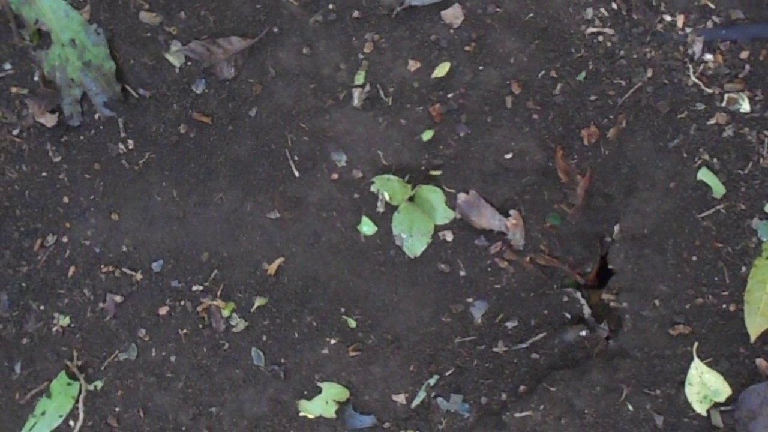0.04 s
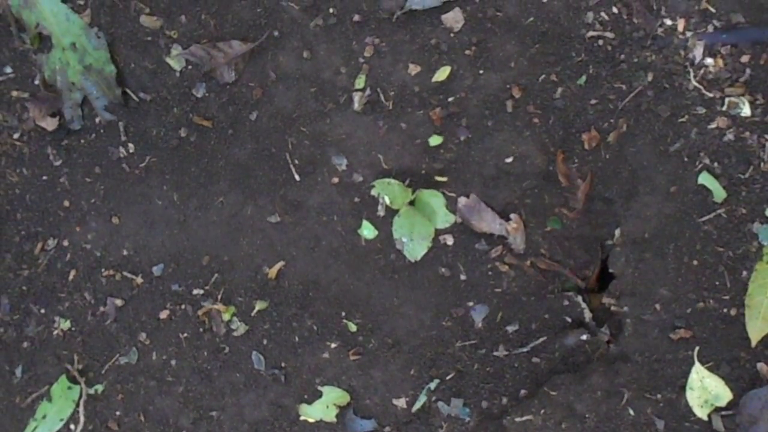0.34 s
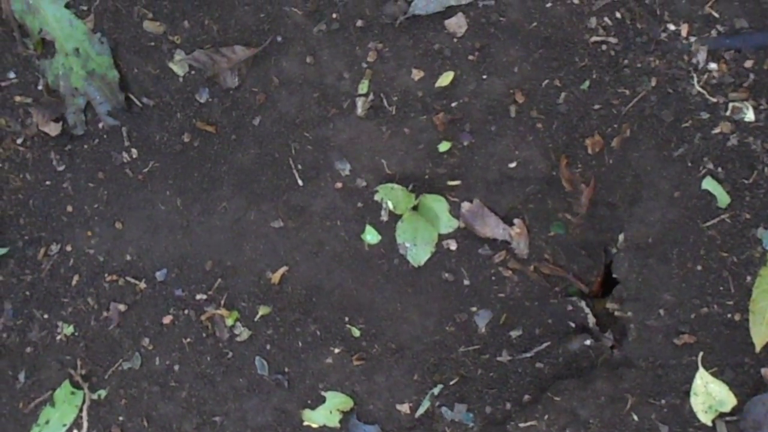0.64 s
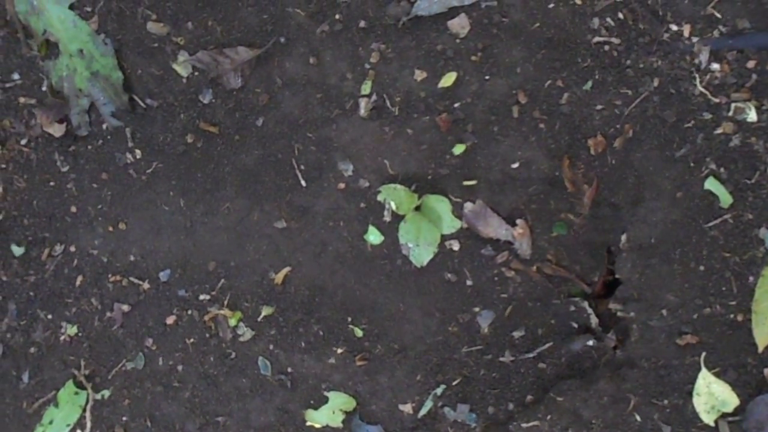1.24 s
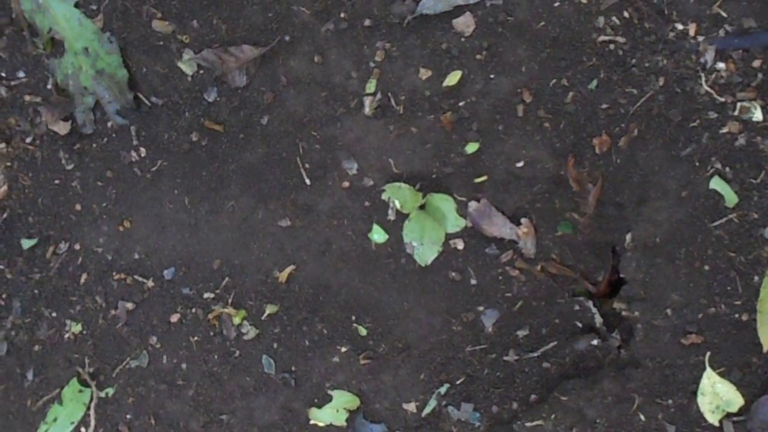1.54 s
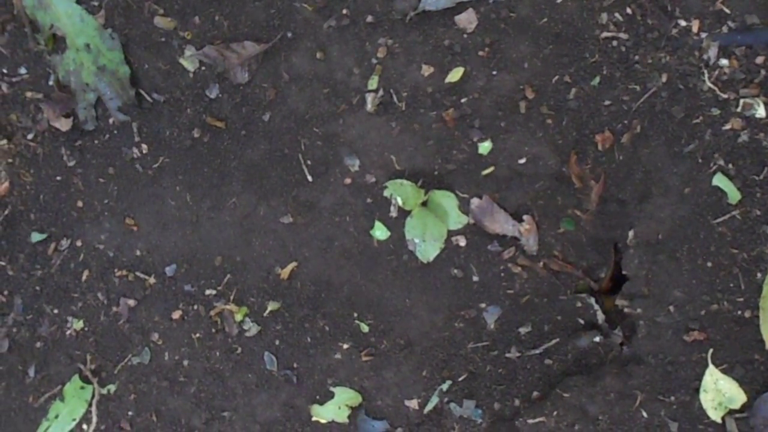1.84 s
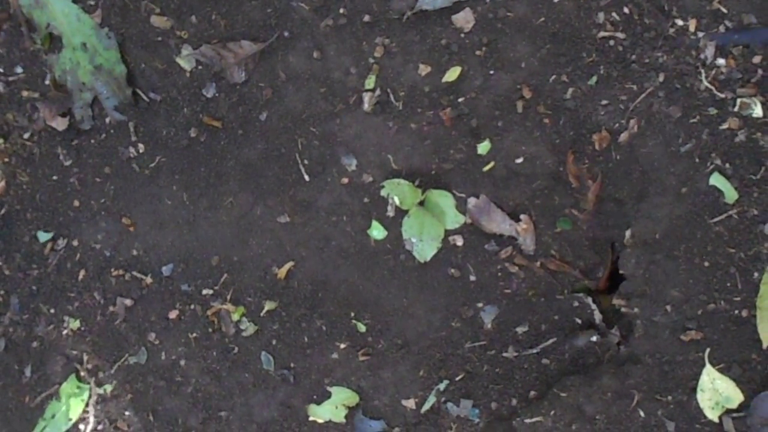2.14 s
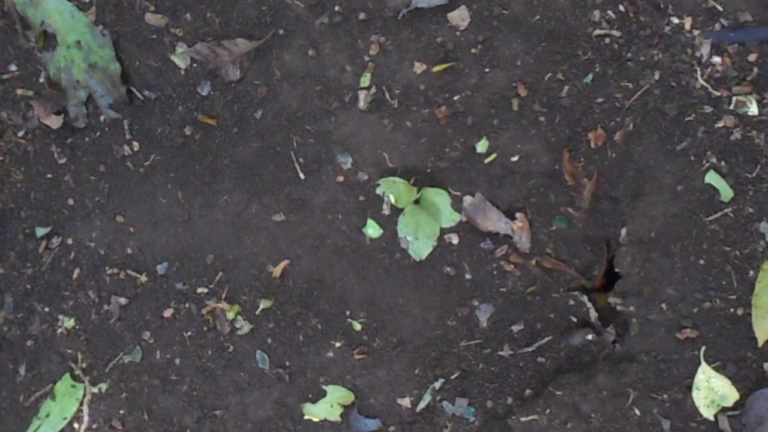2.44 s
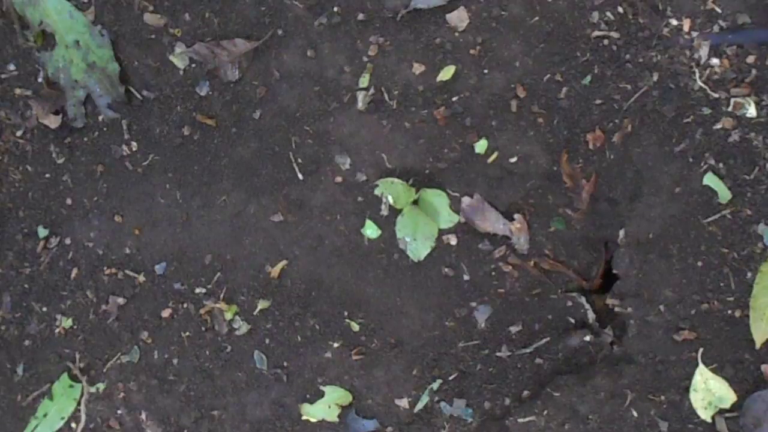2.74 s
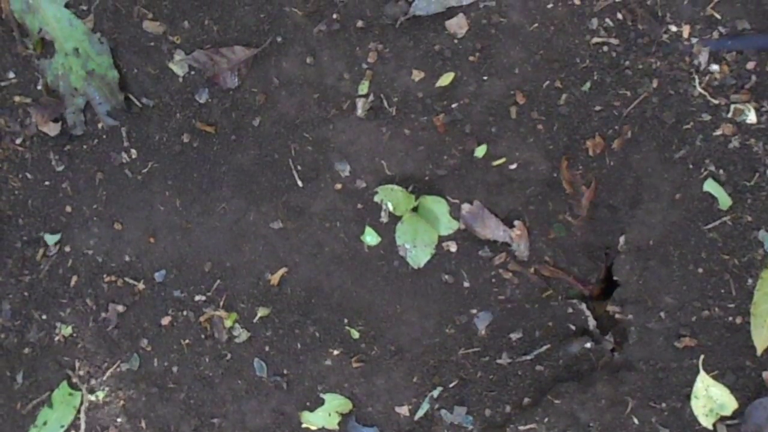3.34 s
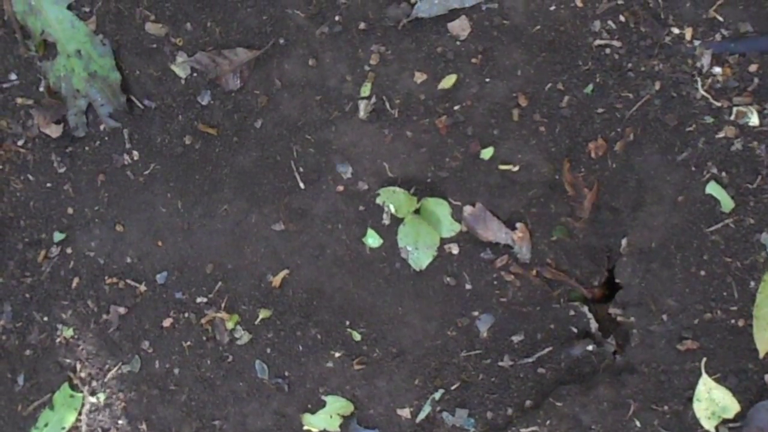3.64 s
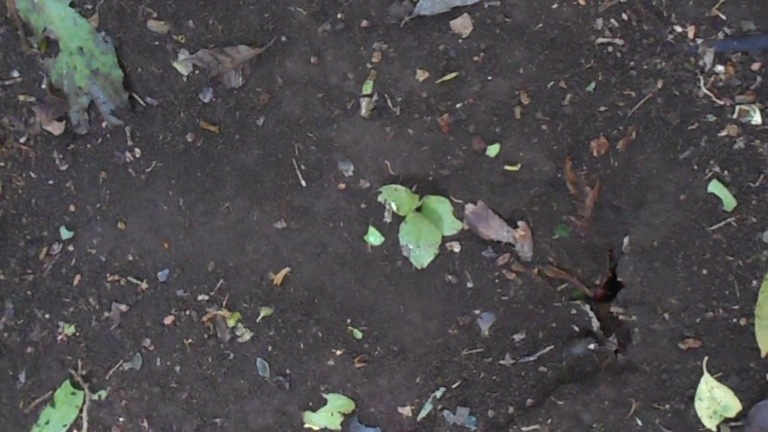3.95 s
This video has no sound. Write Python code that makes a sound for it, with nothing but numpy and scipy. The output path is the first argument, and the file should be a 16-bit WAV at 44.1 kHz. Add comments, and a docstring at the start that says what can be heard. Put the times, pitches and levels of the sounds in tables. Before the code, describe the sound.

A dense, steady rush, probably water behind trees, reaches one microphone over a forest floor. Leaves rustle faintly with a few dry ticks, settle, then return more softly as one sharper tick and a few smaller ones sound.

```python
"""A forest floor on one microphone, with a dense, steady rush far off, probably water behind trees.
For the first second leaves rustle over it, countless small contacts, with a few sharp ticks from
the dry litter. The leaves settle, then return more softly; at 2.5 s comes the loudest tick, and
a few smaller ones follow. Near the end a faint low rumble swells once."""
import sys
import numpy as np
from scipy import signal
from scipy.fft import rfft, irfft, next_fast_len
from scipy.io import wavfile
from scipy.ndimage import uniform_filter1d, map_coordinates

SR = 44100
rng = np.random.default_rng(int(sys.argv[2]) if len(sys.argv) > 2 else 0)


def to_wav(sig):
    """Store sig (one row per channel, or 1-D mono) as 16-bit WAV at the path in sys.argv[1].

    Samples outside -1..1 are clipped; the rate is SR.
    """
    pcm = np.clip(np.atleast_2d(sig), -1, 1) * 32767
    pcm = np.round(pcm).astype(np.int16)
    wavfile.write(sys.argv[1], SR, pcm.T)  # frames by channels


N = 176400

# spectrum of the far rush through the trees: frequency_hz, density_db
RUSH_SPECTRUM = [(20, -37.5), (60, -31.5), (110, -27), (200, -22.4), (300, -16.5), (500, -9.5), (750, -4.5),
                 (1100, -1.5), (1650, -2.5), (2300, -.5), (2900, -0.4), (3350, 0.96), (4000, -0.46),
                 (5000, -1.84), (6100, -1.5), (7000, -6), (8100, -9), (9500, -18.5), (10500, -27)]
# its nearly even level: time_s, level_db
RUSH_LEVELS = [(0, -44.5), (.7, -45.5), (1.7, -45), (2.4, -44.9), (3.1, -45), (4, -44.5)]
# spectrum of leaf touching leaf: frequency_hz, density_db
LEAF_SPECTRUM = [(300, -40), (1200, -8), (2400, 0.5), (4300, 1), (6200, 1.5), (8000, -5), (10500, -24.5)]
# the rustle settling and returning: time_s, level_db
RUSTLE_LEVELS = [(0, -48.3), (.5, -49.5), (.7, -50.5), (.88, -51.5), (.97, -49.5), (1.08, -55),
                 (1.2, -53.5), (1.7, -69), (2.5, -56.5), (4, -56)]
# ticks in the dry litter, crackle and glint relative to the snap:
# start_s, level_db, pitch_hz, crackle_t60_s, crackle_db, glint_db
LITTER_TICKS = [(0.3636, -28, 4100, .008, -8, -18), (.4730, -29, 6540, 0.011, -13, -13),
                (.4760, -33, 6000, .006, -10, -16), (0.937, -32.5, 4500, .011, -4, -20),
                (0.9796, -37, 4600, .016, -4, -20), (.9833, -30, 5600, .012, -7, -18),
                (1.0583, -31, 5800, 0.033, -6.5, -20), (1.073, -38, 3900, .06, -5, -20),
                (2.4968, -16.5, 4100, 0.0063, -16, -9), (2.7894, -31, 4500, .003, -12, -20),
                (2.7914, -23, 5300, 0.0041, -10, -24), (2.7923, -25, 6650, .004, -6, -24),
                (2.8829, -27.5, 5750, 0.012, -9, -24)]
# spectrum of the low rumble: frequency_hz, density_db
RUMBLE_SPECTRUM = [(20, -26), (70, -7), (135, -3), (210, -4), (400, -17.5)]


def amp(db):
    """Decibels to gain."""
    return 10 ** (np.asarray(db) / 20)


def unit(x):
    """Scale to rms 1."""
    return x / np.sqrt(np.mean(x ** 2) + 1e-20)


def curve(rows):
    """One value per sample from (time_s, value) points."""
    return np.interp(np.arange(N) / SR, *np.transpose(rows))


def wobble(rate):
    """A smooth random curve, rate knots a second."""
    knots = rng.standard_normal(int(N * rate / SR) + 4)
    return map_coordinates(knots, [np.arange(N) * rate / SR])


def filtered(x, response):
    """x times a response of frequency."""
    m = next_fast_len(len(x) + 8192)
    return irfft(rfft(x, m) * response(np.fft.rfftfreq(m, 1 / SR)), m)[:len(x)]


def coloured(x, points):
    """x shaped by (frequency_hz, density_db) points on a log axis, at rms 1."""
    f, db = np.transpose(points)
    return unit(filtered(x, lambda hz: amp(np.interp(np.log(hz + 1), np.log(f), db))))


def patchy_noise(patchy_db):
    """White noise with patches of random gain in time and frequency."""
    spectra = signal.stft(rng.standard_normal(N), nperseg=512)[2]
    patches = uniform_filter1d(rng.standard_normal(spectra.shape), size=8, axis=0)
    patches = uniform_filter1d(patches, size=14, axis=1)
    return signal.istft(spectra * amp(patchy_db * unit(patches)), nperseg=512)[1][:N]


def distant_rush():
    """Far off, probably water, blurred by the trees into a smooth hiss that wavers slightly."""
    hiss = coloured(patchy_noise(patchy_db=0.3), RUSH_SPECTRUM)
    waver_db = 0.15 * wobble(rate=7.85)
    return amp(curve(RUSH_LEVELS) + waver_db) * hiss


def contacts(per_s, spread_db):
    """Impulses at random moments, of random sign and size."""
    size = amp(spread_db * np.clip(rng.standard_normal(N), -2, 2))
    return (rng.random(N) < per_s / SR) * np.sign(rng.standard_normal(N)) * size


def leaf_rustle():
    """Countless leaf contacts flutter with the breeze; a few stand out as a light patter."""
    rustle = coloured(contacts(per_s=6000, spread_db=3.5), LEAF_SPECTRUM)
    patter = coloured(contacts(per_s=70, spread_db=3.5), LEAF_SPECTRUM)
    flutter_db = 1.5 * wobble(rate=24.8)
    return amp(curve(RUSTLE_LEVELS) + flutter_db) * rustle + amp(-63) * patter


def litter_ticks():
    """Dry litter snaps for a few cycles with a higher glint, and crackles around the snap's pitch."""
    snap_cycles, rise_s, crackle_octaves = 5.1, 0.00004, 0.3
    glint_hz, glint_t60_s = 8400, 0.0035  # a higher, weaker mode in every snap
    band_hz = [2600, 8400]  # neither bass nor high treble
    out = np.zeros(N + SR)
    t = np.arange(SR // 10) / SR
    fade = lambda t60_s: np.exp(-np.log(1000) * t / t60_s)
    rise = 1 - np.exp(-t / rise_s)
    glint = np.sin(2 * np.pi * glint_hz * t) * fade(glint_t60_s)
    for start_s, level_db, pitch_hz, crackle_t60_s, crackle_db, glint_db in LITTER_TICKS:
        snap = np.sin(2 * np.pi * pitch_hz * t) * fade(snap_cycles / pitch_hz)
        snap /= np.abs(rise * snap).max()
        around_pitch = lambda hz: np.exp(-0.5 * (np.log2((hz + 1) / pitch_hz) / crackle_octaves) ** 2)
        crackle = unit(filtered(rng.standard_normal(len(t)), around_pitch)) * fade(crackle_t60_s)
        tick = rise * (snap + amp(glint_db) * glint + amp(crackle_db) * crackle)
        out[round(start_s * SR):][:len(t)] += amp(level_db) * tick
    bandpass = signal.butter(4, band_hz, 'band', fs=SR, output='sos')
    return signal.sosfilt(bandpass, out[:N])


def low_rumble():
    """Faint, low noise swells and fades once under the rush."""
    peak_s, width_s, level_db = 3.815, 0.052, -69.5
    swell = np.exp(-0.5 * ((np.arange(N) / SR - peak_s) / width_s) ** 2)
    return amp(level_db) * swell * coloured(rng.standard_normal(N), RUMBLE_SPECTRUM)


def scene():
    """The far rush and the sounds of the forest floor meet at one microphone."""
    return (distant_rush() + leaf_rustle() + litter_ticks() + low_rumble())[None]


def record(dry):
    """The camera's sound falls off steeply above its band limit."""
    limit_hz, steepness = 10350, 60
    return np.array([filtered(x, lambda hz: 1 / (1 + (hz / limit_hz) ** steepness)) for x in dry])


dry = scene()
out = record(dry)
to_wav(out)
```